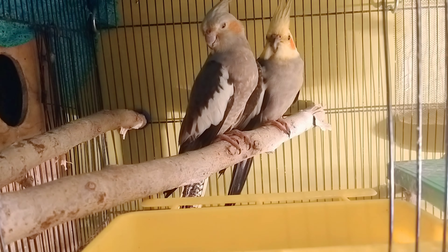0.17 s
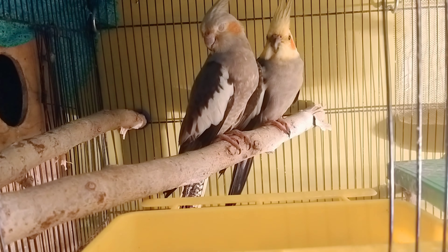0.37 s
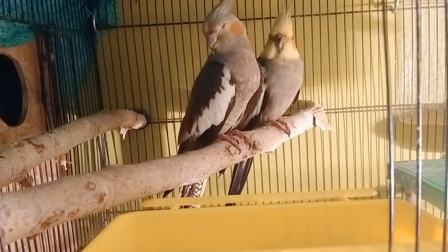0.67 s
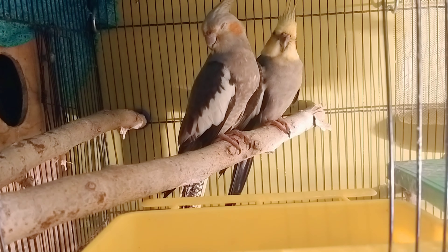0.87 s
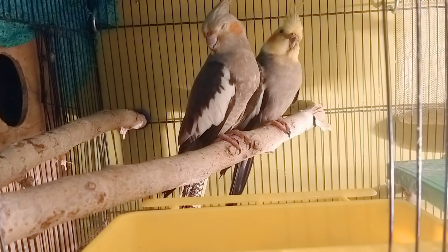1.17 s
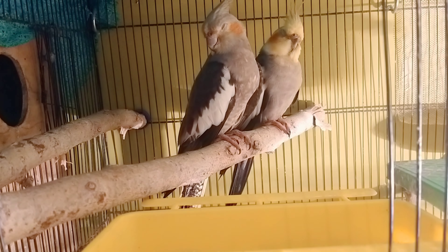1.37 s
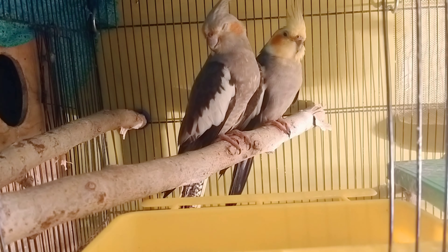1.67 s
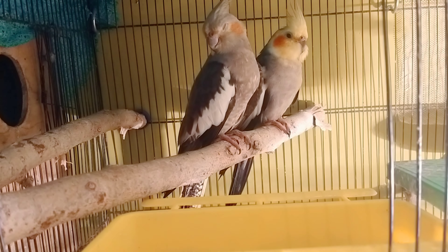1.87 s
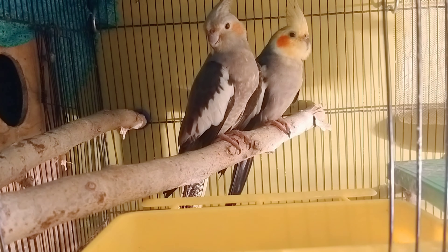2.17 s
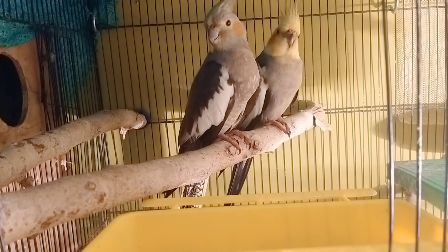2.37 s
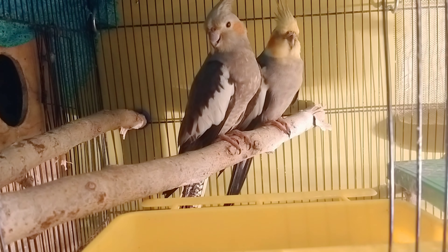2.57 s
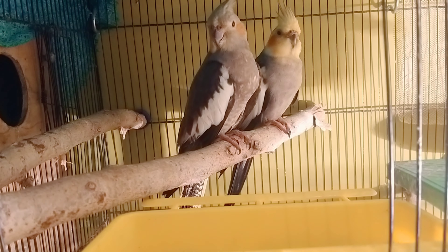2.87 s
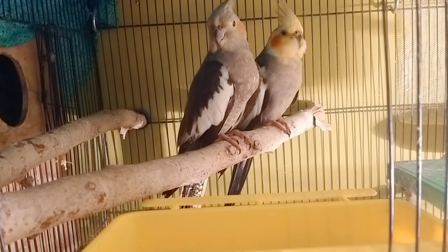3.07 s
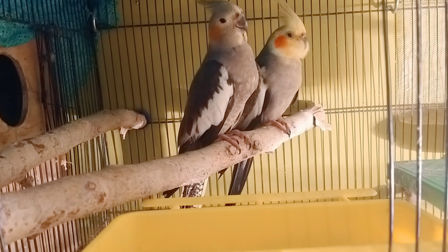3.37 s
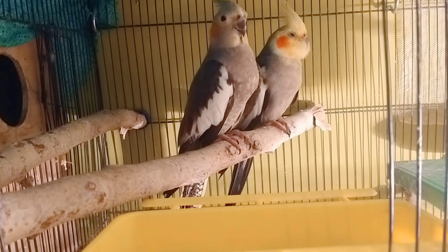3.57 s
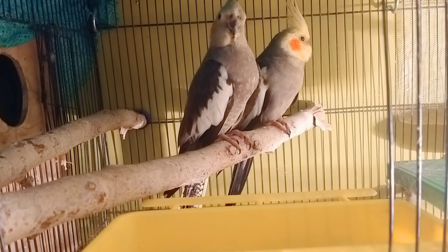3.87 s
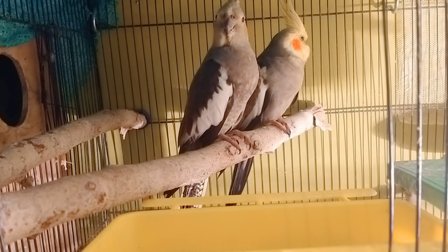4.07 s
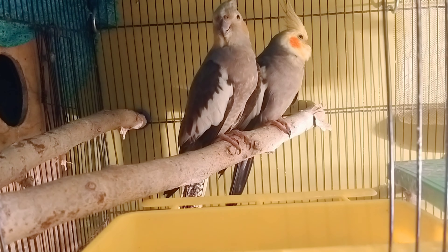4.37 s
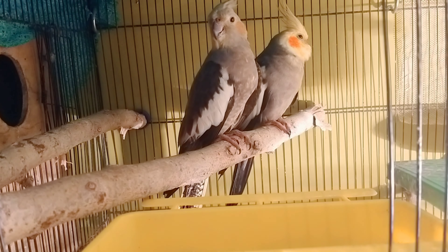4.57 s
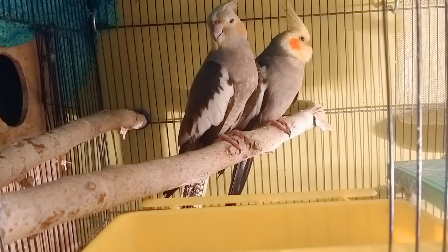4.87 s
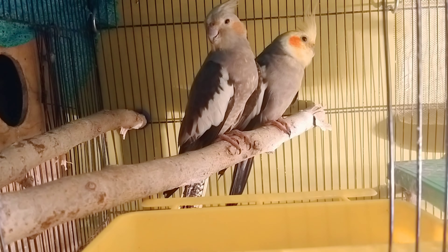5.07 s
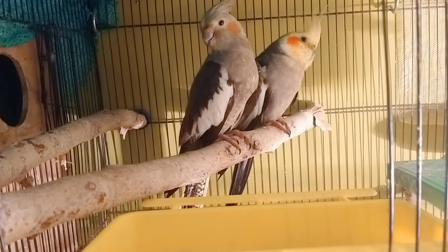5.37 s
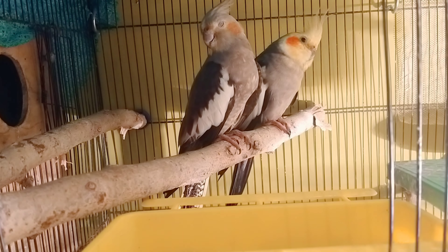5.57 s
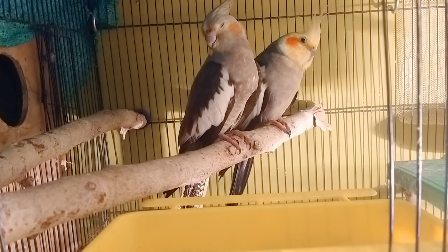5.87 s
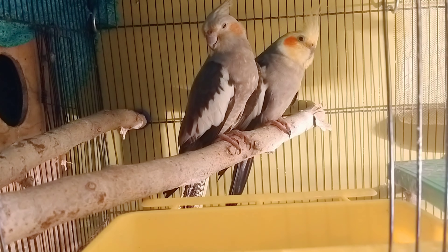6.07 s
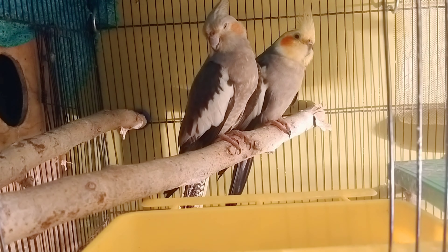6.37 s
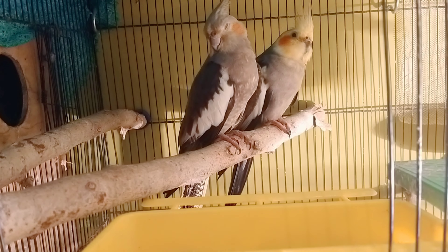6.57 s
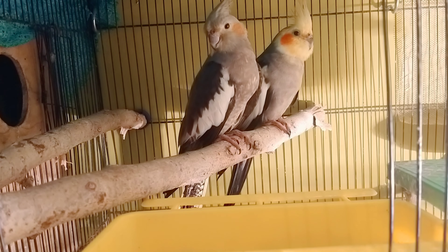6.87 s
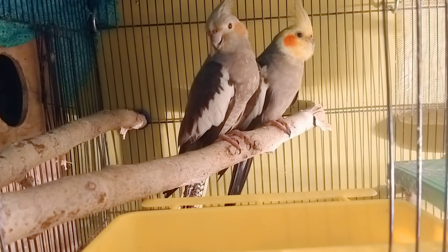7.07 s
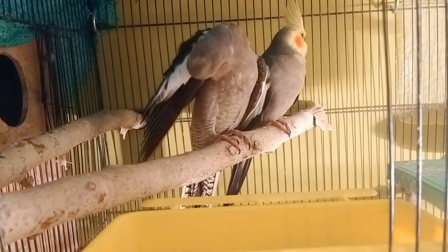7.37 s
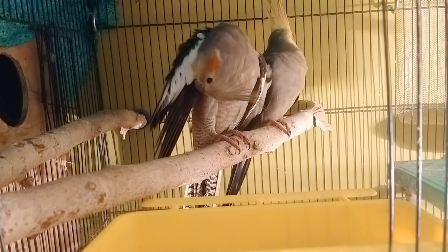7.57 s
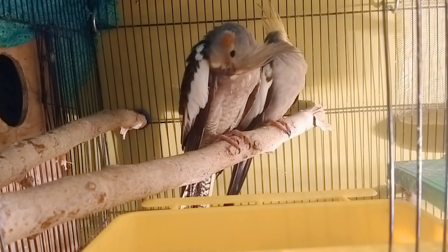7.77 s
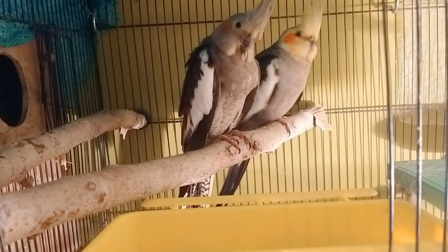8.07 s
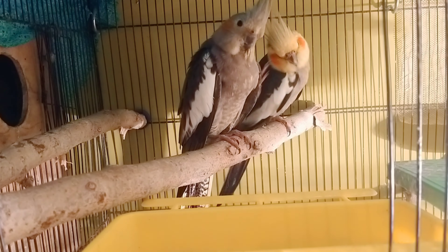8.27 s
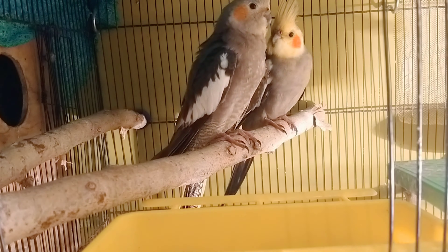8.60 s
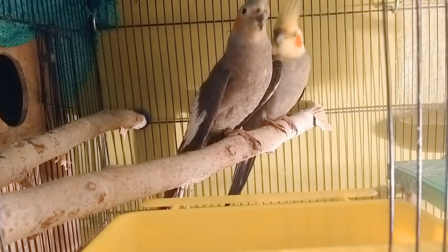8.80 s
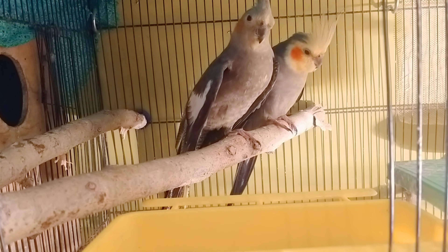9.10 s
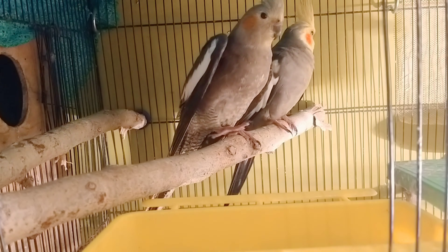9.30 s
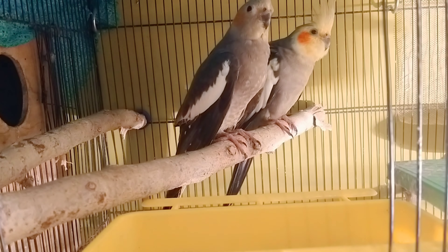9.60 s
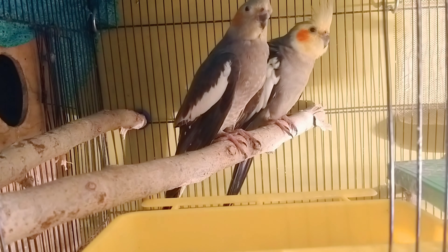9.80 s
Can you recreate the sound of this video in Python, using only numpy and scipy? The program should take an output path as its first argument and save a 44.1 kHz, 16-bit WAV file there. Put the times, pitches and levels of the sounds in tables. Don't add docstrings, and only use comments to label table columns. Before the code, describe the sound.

Thin, bright claw scrapes in quick little groups over quiet room hiss, with light taps, tiny wire rings and a sudden tray rattle.

```python
import sys
import numpy as np
from scipy import signal
from scipy.fft import rfft, irfft, next_fast_len
from scipy.io import wavfile

SR = 44100
rng = np.random.default_rng(int(sys.argv[2]) if len(sys.argv) > 2 else 0)


def persist_wave(psi):
    counts = np.round(np.clip(psi, -1, 1) * 32767).astype(np.int16)
    wavfile.write(sys.argv[1], SR, np.atleast_2d(counts).T)


def convert_level_to_amplitude(level_db):
    exponent = np.asarray(level_db, float) / 20
    return 10 ** exponent


N = 438354

# pitch in Hz, level in dB per Hz.
HUM_SPECTRUM = [(150, -58), (250, 5), (426, -11), (536, -9), (707, -6.5), (838, -15.5), (969, -10),
                (1250, -6), (1550, -8), (2100, -10), (4500, -15.5), (5850, -44), (9900, -120)]
HISS_SPECTRUM = [(1760, -32), (3000, -0.5), (3300, -4.5), (4140, -6), (5950, -4), (7770, -6), (10000, -9),
                 (13000, -43.5), (22000, -120)]
RUSTLE_SPECTRUM = [(5290, -41.5), (9000, -6.5), (9500, -5.5), (11000, -3), (12000, -1.5), (14900, -2.5),
                   (15800, -5.5)]

# time in seconds, level in dB.
BUSTLE_CURVE = [(0.0, -56), (0.36, -59.5), (2.49, -57.5), (2.88, -60), (3.6, -58.5), (3.74, -57),
                (4.98, -58), (5.09, -55.5), (5.59, -58), (5.81, -56), (6.37, -59), (6.87, -54.5),
                (7.17, -57), (7.34, -53), (7.94, -59), (8.25, -55), (9.08, -59.5), (9.94, -57.5)]
# time in seconds, level in dB.
STIR_CURVE = [(0.0, -57), (0.69, -62), (1.3, -64), (2.02, -58), (3.49, -63.5), (4.4, -58), (4.73, -65.5),
              (5.2, -60.5), (5.48, -65), (5.95, -58.5), (6.14, -64.5), (7.17, -58.5), (7.31, -53),
              (7.8, -62.5), (8.36, -59), (8.78, -67.5), (9.66, -61), (9.94, -64)]

# pitch in Hz, width in Hz, level in dB.
WOOD_MODES = [(6300, 300, -9), (7206, 280, 0.3), (8000, 140, -3), (8770, 510, -4), (10070, 310, 2.5)]
CLAW_MODES = [(10830, 250, -9), (11420, 70, 0), (11880, 120, -5.5), (12200, 200, -10), (12560, 200, -11.5)]
TIP_MODES = [(12700, 250, -8.5), (13120, 130, -2), (13920, 130, 0.5), (14500, 170, -4), (15100, 300, -4)]

# start in seconds, length in seconds,
# share of the length spent rising, strength in dB, tip over claw in dB.
HARD_STROKES = [(0.789, 0.034, 0.36, -38.5, 0.5), (0.874, .036, .27, -38, 1),
                (2.044, 0.029, 0.44, -38.5, 2), (2.128, 0.034, 0.36, -37, 1.5),
                (2.226, 0.032, 0.26, -39, 4), (2.319, 0.03, 0.33, -36.5, 0), (4.085, 0.036, .3, -36.5, 4),
                (4.166, 0.033, 0.29, -36.5, 3.5), (4.278, 0.035, 0.32, -37.5, 0),
                (7.324, 0.035, 0.41, -37, 0), (7.412, 0.036, 0.55, -34.5, 2), (8.312, 0.038, 0.44, -35, 9),
                (9.577, 0.029, 0.34, -39, 2), (9.663, 0.039, 0.3, -37.5, 5), (9.746, 0.035, 0.28, -36.5, 2)]
# start in seconds, length in seconds, strength in dB,
# tip over claw in dB.
EDGE_STROKES = [(0.0, 0.04, -48, -16), (0.111, 0.045, -44, -8.5), (0.22, 0.063, -52, -31),
                (0.345, 0.052, -49, -7), (1.148, 0.043, -48, 1), (1.95, 0.056, -53, -14),
                (2.833, 0.031, -52.5, -6.5), (3.272, .031, -50, 2.5), (3.641, 0.056, -49.5, -14),
                (3.771, 0.05, -54, -5), (3.827, 0.055, -44.5, -14), (5.72, 0.052, -50, -3),
                (5.844, 0.048, -49.5, -14), (5.972, 0.054, -51.5, -8), (6.68, 0.055, -54, 0),
                (7.105, .048, -47, -7.5), (7.212, 0.071, -49.5, -4), (7.399, .024, -45, -6),
                (7.358, 0.025, -52, -3), (.465, 0.032, -60, -20), (6.216, 0.041, -62, -3),
                (6.144, .025, -64, -5), (8.41, 0.051, -50.5, -8), (8.29, 0.022, -56, -4),
                (8.667, 0.054, -51, -7.5), (9.907, 0.073, -46.5, -14)]
# start in seconds, length in seconds, strength in dB,
# tip over claw in dB.
POINT_STROKES = [(0.043, .036, -54, 4), (0.566, 0.058, -52, 12), (0.676, 0.045, -49.5, 7),
                 (0.997, 0.067, -58.5, 3), (1.465, 0.047, -58, 2), (1.693, 0.048, -50.5, 7),
                 (1.78, 0.045, -50.5, 18), (1.809, 0.037, -52, -7), (1.669, 0.022, -60, -13),
                 (1.912, .03, -62, -15), (1.539, 0.043, -64, 3), (1.863, 0.052, -52, 21),
                 (2.495, 0.12, -57, 6), (2.693, 0.033, -48.5, 3), (3.15, 0.021, -61, 0),
                 (3.182, 0.081, -50.5, 9), (3.562, 0.03, -49, 16), (3.59, .04, -59, 0),
                 (4.769, 0.03, -66, 8), (4.872, 0.045, -63, 8), (4.7, 0.022, -64, 18),
                 (4.921, 0.023, -59, 6), (5.015, 0.057, -49.5, 17), (5.108, 0.043, -48, 21),
                 (5.138, .045, -46.5, 9), (5.201, 0.051, -49.5, 18), (5.23, 0.053, -46.5, 8),
                 (5.288, 0.056, -49, 15), (6.778, 0.04, -56, 5), (6.803, 0.037, -46, 26),
                 (6.887, 0.04, -45.5, 24), (7.514, 0.02, -52, 15), (7.976, 0.044, -60, 13),
                 (8.073, 0.049, -48.5, 13), (8.168, 0.034, -46, 11), (8.522, 0.045, -51, -6),
                 (9.062, 0.04, -47, 10)]
# start in seconds, length in seconds, strength in dB.
SHUFFLES = [(1.607, 0.047, -63), (2.439, 0.069, -61.5), (2.95, 0.033, -65), (3.308, 0.073, -67),
            (4.44, 0.077, -61), (6.35, 0.076, -66), (7.055, 0.03, -59), (7.699, 0.072, -62.5),
            (8.723, 0.14, -62), (8.973, 0.075, -60.5), (9.285, .055, -63), (9.375, 0.05, -62),
            (9.45, .11, -65)]
# start in seconds, length in seconds, strength in dB,
# tip over claw in dB, wood level in dB.
SNAPS = [
    (8.533, .016, -32, 20, -75),
    (8.556, .01, -48, 22, -75),
    (8.365, .02, -58, 0, -56),
    (3.865, .04, -52, 10, -58),
]

# start in seconds, length in seconds, pitch in Hz, level in dB.
WIRE_RINGS = [(0.285, 0.035, 4370, -61), (2.967, 0.122, 11412, -65), (4.25, 0.145, 7967, -66),
              (4.255, 0.139, 10077, -63), (4.279, 0.11, 3962, -59), (4.377, 0.029, 11412, -63),
              (4.633, 0.035, 8656, -69), (5.927, 0.035, 14168, -69), (6.165, 0.035, 3832, -66),
              (7.477, 0.087, 10508, -66), (7.495, 0.134, 6976, -68), (7.524, 0.093, 8354, -67),
              (7.558, 0.029, 14987, -67), (7.628, 0.029, 3402, -68), (8.029, 0.035, 3789, -67),
              (8.661, 0.064, 11154, -65), (9.364, 0.07, 8225, -69)]
# start in seconds, length in seconds, pitch in # Hz, level in dB.
MORE_RINGS = [(.06, 0.015, 5900, -53), (.36, 0.3, 8000, -71), (.04, .03, 9000, -63),
              (8.72, 0.069, 1400, -58.5), (5.9, 0.49, 1790, -68), (9.3, 0.35, 1600, -69.5),
              (1.15, 0.2, 740, -71), (.92, .025, 11700, -60), (8.69, .025, 4100, -60),
              (6.785, .03, 3850, -59), (.532, 0.03, 10500, -59), (.6, 0.023, 9800, -50),
              (.99, 0.028, 4350, -55.5), (2.025, 0.022, 8600, -57), (2.94, 0.031, 9150, -51),
              (3.182, 0.037, 4760, -61.5), (3.59, 0.019, 2950, -48.5), (4.247, 0.2, 11950, -58.5),
              (4.45, .03, 11300, -63), (8.247, 0.018, 3880, -51.5), (4.279, 0.13, 950, -63.5),
              (4.651, 0.053, 1630, -53.5), (4.68, 0.18, 967, -69), (4.865, .03, 620, -57.5),
              (5.951, 0.045, 1600, -56), (0.753, .02, 8700, -59), (0.12, .045, 2700, -58.5),
              (2.55, 0.023, 4750, -62), (0.465, .04, 8950, -60), (.68, .02, 9150, -55),
              (.575, .025, 7500, -62), (8.4, 0.03, 1600, -52), (6.22, .05, 13500, -62),
              (7.06, 0.044, 720, -60), (0.4, 0.055, 3080, -64), (1.15, 0.33, 1750, -62.5),
              (1.3, .02, 3200, -61), (1.51, .04, 7000, -69), (2.295, .025, 9800, -65),
              (4.497, 0.78, 1840, -65.5), (4.75, 0.027, 5850, -66), (4.863, 0.031, 13700, -53),
              (9.2, .045, 9300, -60), (3.779, 0.15, 950, -68)]
# start in seconds, length in seconds, top pitch in Hz, level in dB.
SQUEAKS = [(0.673, .03, 7500, -60), (1.15, .03, 7700, -53.5), (1.155, .02, 8400, -62),
           (1.695, .028, 7350, -59), (1.88, .03, 7500, -64), (3.557, 0.03, 9200, -58),
           (3.853, 0.039, 7400, -56), (5.025, 0.018, 7900, -58), (5.113, 0.022, 7400, -64),
           (5.15, 0.035, 7470, -55), (5.146, 0.032, 6200, -58), (5.243, .03, 7500, -61),
           (5.243, 0.033, 6300, -63), (5.3, 0.036, 7300, -68), (6.895, 0.027, 7600, -58),
           (8.073, 0.039, 7300, -56), (8.075, .035, 5900, -60), (8.167, 0.032, 7300, -52.5),
           (8.168, .035, 5900, -58), (8.31, 0.035, 7100, -49), (9.065, 0.027, 7300, -65)]

# centre in seconds, half length in seconds, level in dB.
FLUFFS = [
    (2.38, 0.28, -64.5),
    (3.95, 0.056, -64),
    (3.62, 0.083, -63.5),
    (3.77, .025, -60),
    (6, .05, -59.5),
    (.11, 0.046, -66.5),
    (7.33, 0.088, -65),
    (8.353, 0.065, -57),
]

# time in seconds, peak in dB, pitch in Hz, 60 dB fade in seconds.
KNOCKS = [(0.56, -47, 1920, 0.02), (1.616, -45, 1500, 0.013), (1.983, -42, 1395, 0.011),
          (3.834, -46, 1400, 0.02), (4.273, -52, 970, 0.03), (5.022, -48, 2400, 0.025),
          (5.028, -49, 1600, .02), (5.654, -51, 2600, 0.022), (5.722, -47, 1700, .015),
          (5.735, -49, 2500, .015), (5.757, -47, 1500, .015), (5.748, -41.5, 2050, 0.02),
          (5.943, -45, 1600, 0.028), (6.898, -51, 1980, .04), (6.958, -38, 580, 0.027),
          (6.963, -36, 800, .015), (6.972, -48, 1200, 0.014), (6.964, -37, 1450, .01),
          (6.963, -42, 1950, .01), (6.962, -44, 1350, 0.012), (7.032, -45, 1380, .01),
          (7.033, -36.5, 756, 0.04), (7.037, -43, 1200, .015), (7.033, -46, 2450, .015),
          (0.11, -44, 1480, 0.027), (7.106, -54, 2000, 0.031), (7.44, -44, 2300, 0.03),
          (7.436, -46, 1500, .015), (7.444, -46, 1950, .03), (7.372, -49, 1950, 0.024),
          (8.04, -46.5, 1950, 0.028), (8.368, -45, 3750, 0.025), (8.372, -45, 1600, .025),
          (8.376, -48, 1100, .02), (9.665, -39, 632, 0.07), (9.672, -49, 1440, 0.02),
          (3.77, -48, 2900, 0.03), (7.334, -45, 1900, 0.035), (7.28, -46.5, 3000, 0.022)]

# time in seconds, level in dB, brightness in dB, extra ring of the rim in dB.
BOUNCES = [(6.6785, -33, 2, 8), (6.685, -37, -12, -8), (6.690, -26, -10, -2), (6.696, -31, -13, -1),
           (6.702, -37.5, 5, -1), (6.705, -22, -7, -5.5), (6.712, -26.5, -10, -10), (6.717, -35, -11, -5),
           (6.724, -43, -8, 5), (6.729, -44, -13, -4), (6.734, -41, -8, 9), (6.744, -47, -20, 0)]
# pitch in Hz, level in dB, 60 dB fade in seconds.
TRAY_MODES = [(1012, -11.5, .025), (1122, -6, 0.052), (1445, -1, 0.032), (1960, 1.5, 0.05),
              (2000, -5, 0.047), (2075, -10, 0.06), (2385, -14, 0.03), (2490, -11.5, .05),
              (2738, -1.5, 0.048), (3420, -16, .03), (4050, -18, 0.02), (4795, -20, 0.03),
              (5900, -34, 0.02), (7100, -32, .015)]

# pitch in Hz, width in Hz, level in dB.
CASE_MODES = [(557, 71, 5), (736, 46, 6.5), (993, 94, 3.5), (1479, 64, 7.5), (1588, 45, 6.5),
              (1765, 24, 7.5), (1951, 52, 10), (2373, 100, 7.5), (2700, 28, 2.5), (3290, 120, 3.5),
              (3866, 51, 3.5), (4330, 63, 3.5), (5900, 72, 3)]


def rms_one(x):
    return x / np.sqrt(np.mean(x ** 2) + 1e-30)


def add(out, start, x):
    at = max(int(start * SR), 0)
    out[at:at + len(x)] += x[:len(out) - at]


def resonate(x, hz, width_hz):
    r = np.exp(-np.pi * width_hz / SR)
    feedback = [1, -2 * r * np.cos(2 * np.pi * hz / SR), r * r]
    return signal.lfilter([(1 - r * r) / 2, 0, (r * r - 1) / 2], feedback, x)


def resonate_twice(x, hz, width_hz):
    return resonate(resonate(x, hz, width_hz), hz, width_hz)


def ring(push, hz, t60):
    r, w = convert_level_to_amplitude(-60 / (t60 * SR)), 2 * np.pi * hz / SR
    return signal.lfilter([0, np.sin(w)], [1, -2 * r * np.cos(w), r * r], push)


def high_pass(x, order, hz):
    return signal.sosfilt(signal.butter(order, hz, "high", fs=SR, output="sos"), x + 1e-18)


def drift(rate):
    knots = np.clip(rng.standard_normal(int(N / SR * 40) + 2), -3, 1.8)
    return np.interp(np.arange(0, N, 16) / SR * rate, np.arange(len(knots)), knots)


def patchy_noise(spectrum, patchy_db):
    hz, db = np.transpose(spectrum)
    edges = np.geomspace(hz[0], hz[-1], int(3 * np.log2(hz[-1] / hz[0])) + 2)
    size = next_fast_len(N)
    f = np.arange(size // 2 + 1) * SR / size + 1
    coloured = rfft(rng.standard_normal(size)) * convert_level_to_amplitude(np.interp(np.log(f), np.log(hz), db))
    out, together = np.zeros(N), drift(18)
    for low, high in zip(edges, edges[1:]):
        band = irfft(coloured * ((f >= low) & (f < high)), size)[:N]
        flicker_db = patchy_db * (.8 * together + drift(25))
        out += band * np.repeat(convert_level_to_amplitude(flicker_db), 16)[:N]
    return rms_one(out)


def echoes(x):
    t60 = 0.065
    t = np.arange(int(.3 * SR)) / SR
    tail = rng.standard_normal(len(t)) * convert_level_to_amplitude(-60 * t / t60) * (t > .003)
    return signal.fftconvolve(x, tail / np.sqrt(np.sum(tail ** 2)))[:N]


def room():
    t = np.arange(N) / SR
    bustle_db = np.interp(t, *np.transpose(BUSTLE_CURVE))
    stir_db = np.interp(t, *np.transpose(STIR_CURVE))
    hiss_db = -61 + 0.54 * (bustle_db - bustle_db.mean()) + 0.26 * (stir_db - stir_db.mean())
    hum = convert_level_to_amplitude(0.44 + bustle_db) * patchy_noise(HUM_SPECTRUM, patchy_db=1.5)
    hiss = convert_level_to_amplitude(hiss_db) * patchy_noise(HISS_SPECTRUM, patchy_db=1.0)
    rustle = convert_level_to_amplitude(2.5 + stir_db) * patchy_noise(RUSTLE_SPECTRUM, patchy_db=1.6)
    fan_tone = rms_one(resonate_twice(rng.standard_normal(N), hz=797, width_hz=6))
    fan_stops = 7
    air = hum + hiss + rustle + convert_level_to_amplitude(-78) * fan_tone * (t < fan_stops)
    return convert_level_to_amplitude(-2.0) * (air + convert_level_to_amplitude(-14) * echoes(air))


def strokes():
    rows = [(s, length, rise, -46.0, db, tilt_db) for s, length, rise, db, tilt_db in HARD_STROKES]
    for s, length, db, tilt_db in EDGE_STROKES:
        rows.append((s, length, 0.4, db - 10 + 0.35 * tilt_db, db, tilt_db))
    rows += [(s, length, 0.47, db - 11.5, db, tilt_db) for s, length, db, tilt_db in POINT_STROKES]
    rows += [(s, length, 0.35, db - 7, db, 0) for s, length, db in SHUFFLES]
    rows += [(s, length, 0.35, wood_db, db, tilt_db) for s, length, db, tilt_db, wood_db in SNAPS]
    return [(*row, db - max(tilt_db, 0), db + min(tilt_db, 0)) for *row, db, tilt_db in rows]


def slip_train(size):
    slips_hz, spread, jitter, grit_db = 576, .07, .08, 0.1
    period = SR / (slips_hz * (1 + spread * rng.standard_normal()))
    at = np.cumsum(period * (1 + jitter * rng.standard_normal(80))).astype(int)
    slips = convert_level_to_amplitude(grit_db) * rng.standard_normal(size) / np.sqrt(period)
    heights = convert_level_to_amplitude(2.3 * rng.standard_normal(80))
    slips[at[at < size]] += heights[at < size]
    return slips


def pressure(t, length, rise):
    top, touch = np.clip(rise, .05, .95) * length, .011
    away = np.where(t < top + .004, (top + 0.0034 - t) / top, (t - top - .004) / (length - top))
    return convert_level_to_amplitude(-12 * np.abs(away) ** 2.2) * np.minimum(t / touch, 1)


def rasps():
    out, size = np.zeros(N), int(.13 * SR)
    for start, length, rise, wood_db, claw_db, tip_db in strokes():
        t = np.arange(min(int((1.3 * length + .01) * SR), size)) / SR
        slips = slip_train(size)[:len(t)]
        stroke = pressure(t, length, rise)
        branch = resonate(rng.standard_normal(len(t)), hz=1500, width_hz=3200)
        add(out, start - .004, convert_level_to_amplitude(-58.5 + 0.25 * (wood_db + 57.5)) * stroke * rms_one(branch))

        spread_db = 2.5 * rng.standard_normal((3, 5))
        spread_db[2] += 0.17 * (tip_db - claw_db) * np.arange(-2, 3)
        pressed = np.clip((claw_db + 47) / 6, 0, 1)
        spread_db[1] -= 3 * pressed * np.maximum(np.arange(-1, 4), 0)
        lightness = np.clip((-41 - max(wood_db, claw_db, tip_db)) / 9, 0, 1)
        widen = 1.48 + 2.2 * lightness
        early = np.clip(.5 - t / length, -.7, .5) * np.clip((claw_db - tip_db) / 8, .2, 1)
        shifts = 1 + .008 * rng.standard_normal((3, 5))
        groups = (WOOD_MODES, CLAW_MODES, TIP_MODES)
        for g, (group, level_db) in enumerate(zip(groups, (wood_db, claw_db, tip_db))):
            modes = np.zeros(len(t))
            for k, (hz, width, db) in enumerate(group):
                mode = resonate_twice(slips, hz * shifts[g, k], widen * width)
                modes += (-1) ** k * convert_level_to_amplitude(db + spread_db[g, k] + 9 * k * early) * mode
            heard = rms_one(modes)
            late_db = 0
            if g == 0:
                late_db = 3.5 * np.clip(t / length - .5, -.5, .5)
            else:
                centre_hz = np.mean(group, axis=0)[0]
                heard = heard + convert_level_to_amplitude(-10) * rms_one(resonate_twice(slips, centre_hz, 1800))
            add(out, start - .0065, convert_level_to_amplitude(level_db + 1.57 + late_db) * stroke * heard)
    return out


def wires():
    out = np.zeros(N)
    tiny_per_s, tiny_db, squeak_arch = 9, -73, .045
    luck = rng.random((int(tiny_per_s * N / SR), 4))
    tiny = luck * [N / SR, .03, 9000, 6] + [0, .015, 3000, tiny_db - 3]
    rows = [(*row, 0) for row in list(WIRE_RINGS) + list(MORE_RINGS) + list(tiny)]
    rows += [(*row, squeak_arch) for row in SQUEAKS]
    wobble = np.cumsum(.04 * rng.standard_normal(N + SR))
    for start, length, hz, db, arch in rows:
        t = np.arange(int(length * 1.3 * SR)) / SR
        pitch = hz * (1 - arch * (2 * t / length - 1) ** 2)
        line = np.sin(2 * np.pi * np.cumsum(pitch) / SR + wobble[int(start * SR):][:len(t)])
        swell = np.minimum(t / .012, 1) * convert_level_to_amplitude(-12 * (t / length) ** 3)
        add(out, start, convert_level_to_amplitude(db + 3) * line * swell)
    return out


def fluffs():
    t = np.arange(N) / SR
    swell = sum(convert_level_to_amplitude(db - 11 * np.minimum(((t - s) / half) ** 2, 20)) for s, half, db in FLUFFS)
    return swell * rms_one(resonate_twice(rng.standard_normal(N), hz=2000, width_hz=3300))


def knocks():
    out, t = np.zeros(N), np.arange(int(.2 * SR)) / SR
    for s, db, hz, t60 in KNOCKS:
        contact = rng.standard_normal((2, len(t))) * np.exp(-t / 0.0045) * np.minimum(t / 0.002, 1)
        body = ring(contact[0], hz, min(t60, .09))
        scuff = resonate_twice(contact[1], 300 + .8 * hz, 1.1 * hz)
        scuff_share = 0.59 * hz / 1000
        knock = body / np.abs(body).max() + scuff_share * scuff / np.abs(scuff).max()
        add(out, s - .004, convert_level_to_amplitude(db - 3) * knock)
    thud = convert_level_to_amplitude(-30) * resonate(np.abs(out) + 1e-18, hz=250, width_hz=250)
    return high_pass(out, 4, 430) + thud


def clatter():
    out, t = np.zeros(N), np.arange(int(.12 * SR)) / SR
    rim_hz, skid_s, rattle_s = 2725, .003, .014
    for s, db, bright_db, rim_db in BOUNCES:
        chance_db = 0.89 * rng.standard_normal(len(TRAY_MODES))
        skid = rng.standard_normal((len(TRAY_MODES) + 1, len(t))) * np.exp(-t / skid_s)
        modes = np.zeros(len(t))
        for (hz, level_db, t60), luck_db, rub in zip(TRAY_MODES, chance_db, skid):
            tilt_db = 0.88 * (bright_db + 6.5) * np.log2(min(hz, 3000) / 2000)
            extra_db = rim_db * (abs(hz / rim_hz - 1) < .06)
            mode = resonate(ring(rub, hz, t60), hz, 220 * hz / 2000)
            modes += convert_level_to_amplitude(level_db + luck_db + tilt_db + extra_db) * rms_one(mode)
        crackle = convert_level_to_amplitude(bright_db - 6.0) * rms_one(resonate_twice(skid[-1], 6500, 10000))
        rattle = rms_one(resonate(rng.standard_normal(len(t)) * np.exp(-t / rattle_s), 1100, 2200))
        add(out, s, convert_level_to_amplitude(db - 20.5) * (modes + crackle + convert_level_to_amplitude(-6) * rattle))
    return high_pass(out, 2, 520)


def case(x):
    out = x
    for hz, width, db in CASE_MODES:
        gain = np.repeat(convert_level_to_amplitude(db + 2 * drift(2.5)), 16)[:N]
        out = out + (gain - 1) * resonate(x, hz, width)
    return out


def scene():
    scraped = rasps()
    struck = wires() + knocks() + clatter()
    echo = convert_level_to_amplitude(-13) * echoes(struck + scraped)
    return (struck + echo + case(scraped + room() + fluffs()))[None]


def band_limit(x):
    return signal.sosfilt(signal.butter(12, 16810, fs=SR, output="sos"), x)


def record(dry):
    x = signal.sosfilt(signal.cheby2(4, 40, 300, "high", fs=SR, output="sos"), dry)
    x = signal.sosfilt(signal.ellip(12, .5, 70, 15600, fs=SR, output="sos"), x)
    noise = signal.lfilter([1], [1, -.9], rng.standard_normal(dry.shape))
    return band_limit(x + convert_level_to_amplitude(-96.5) * rms_one(noise))


dry = scene()
out = record(dry)
persist_wave(out)
```